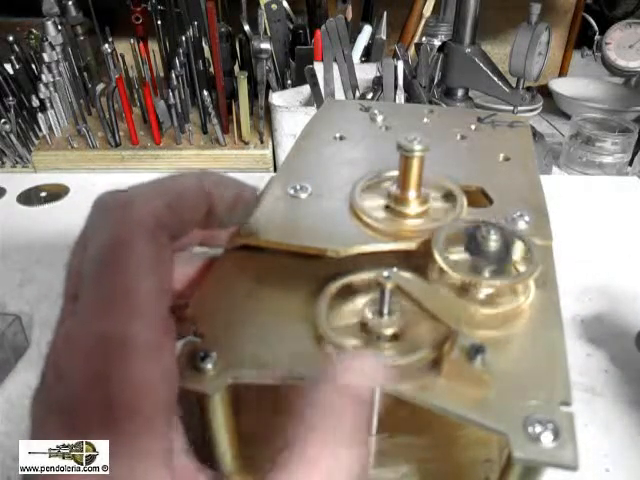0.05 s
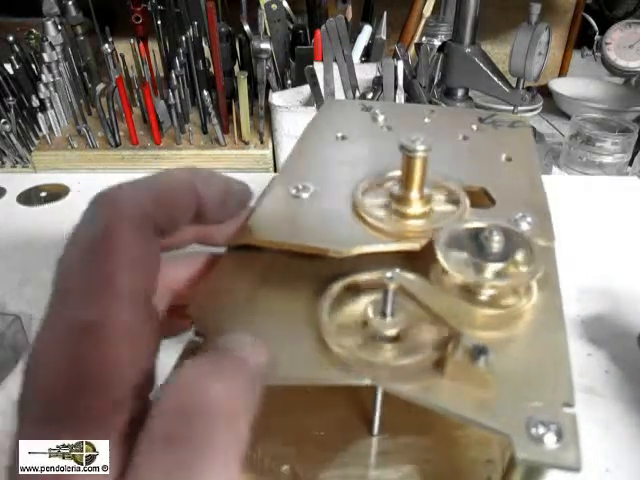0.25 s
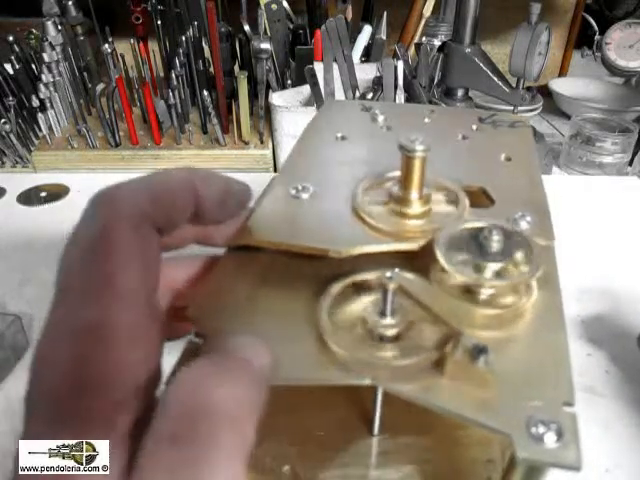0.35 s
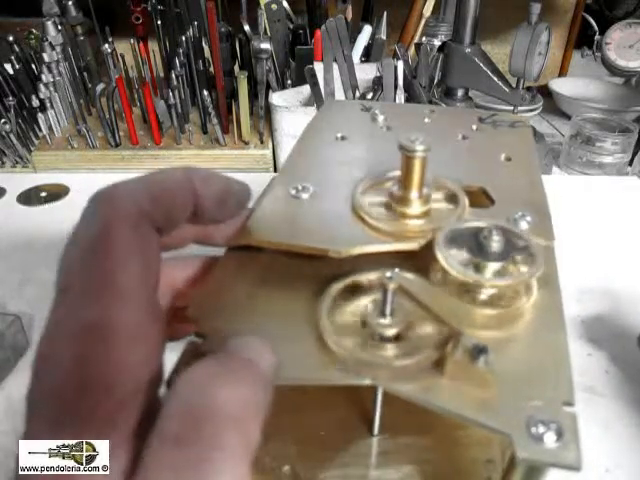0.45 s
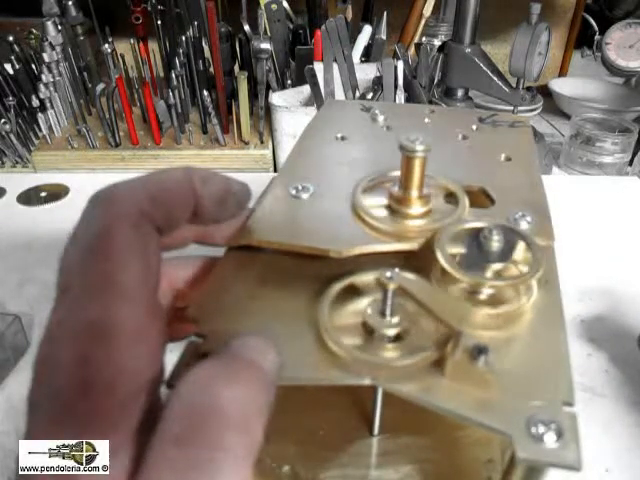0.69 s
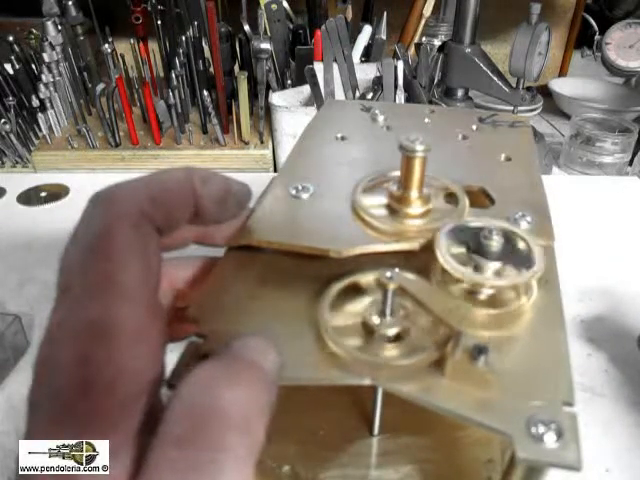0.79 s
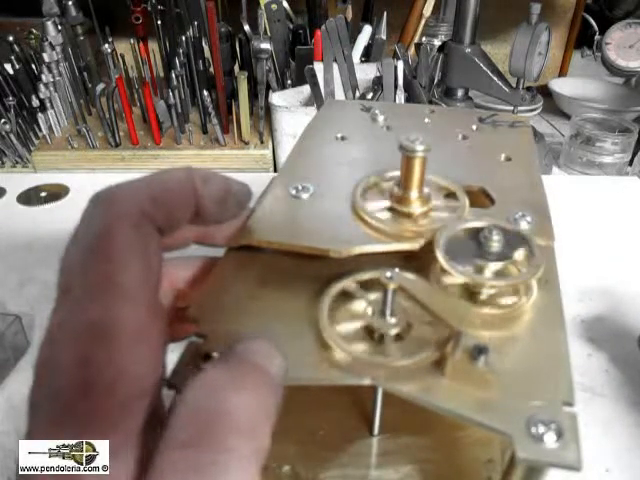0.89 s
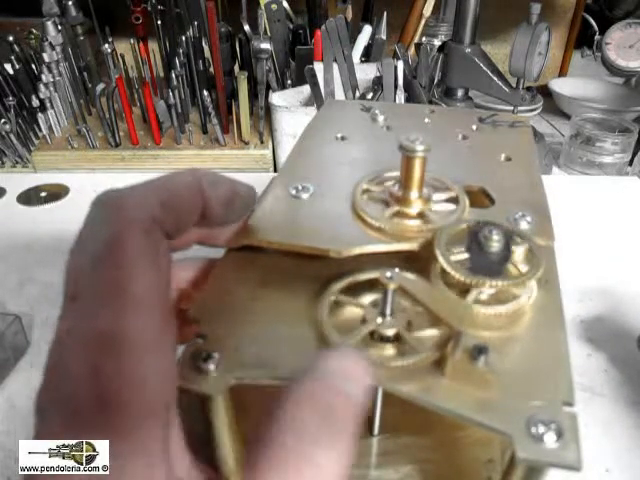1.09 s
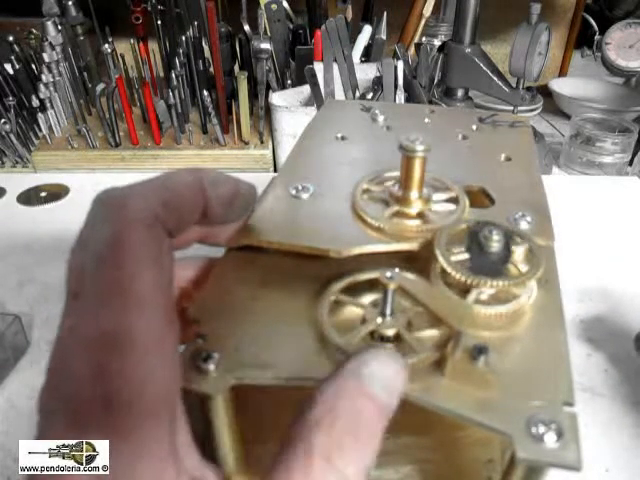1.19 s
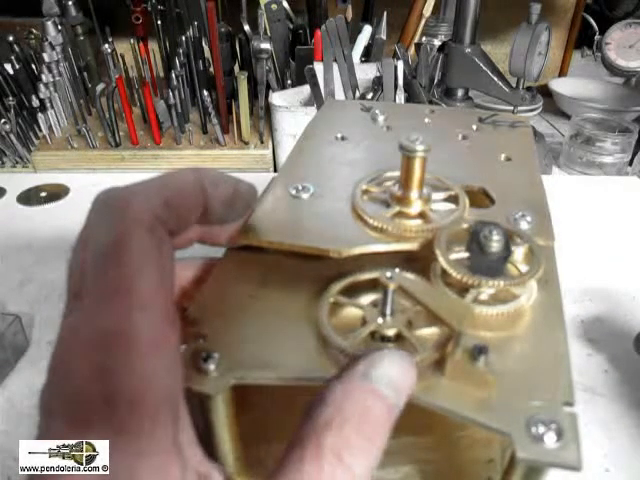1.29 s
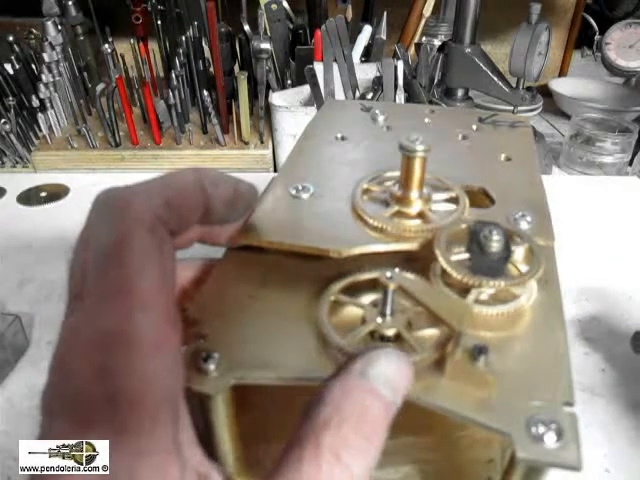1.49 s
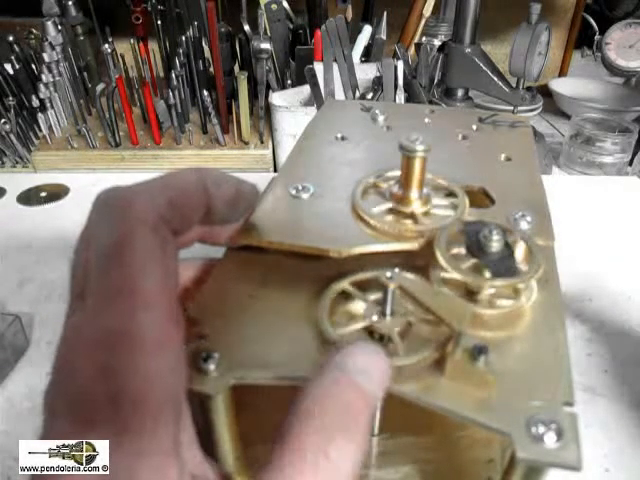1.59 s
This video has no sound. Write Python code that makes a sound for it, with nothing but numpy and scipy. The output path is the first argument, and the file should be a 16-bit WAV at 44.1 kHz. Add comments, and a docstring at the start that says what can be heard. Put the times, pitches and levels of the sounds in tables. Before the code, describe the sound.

Sharp metallic clack and fading gear whirr from a handled clock movement, followed by small clicks.

```python
"""On a workbench in a quiet room, a wheel of a brass clock movement slips from under a thumb.
The frame rings with a sharp clack, and tooth impacts drive a whirr that slows and fades as the gear
train runs down. The frame knocks once on the bench, whose wooden top booms. The thumb returns to the
wheels with two small clicks and a dry pivot squeaks faintly, over room noise and a thin electrical whine."""
import sys
import numpy as np
from scipy import signal
from scipy.fft import next_fast_len
from scipy.io import wavfile
from scipy.ndimage import uniform_filter1d

SR = 44100
rng = np.random.default_rng(int(sys.argv[2]) if len(sys.argv) > 2 else 0)


def wrap_up_sound(samples):
    """Save the sound to the file named by the first command line argument, as 16-bit audio."""
    columns = np.atleast_2d(samples).T
    # keep every value between -1 and 1, then stretch to whole-number steps
    tamed = np.clip(columns, -1, 1)
    steps = np.round(tamed * 32767).astype(np.int16)
    wavfile.write(sys.argv[1], SR, steps)


N = 72765
T = np.arange(N) / SR

# Levels in the tables are relative.
# Blows on the frame, and of a wheel on its stop: start_s, level_db, corner_hz
FRAME_BLOWS = [(0.2145, -17.5, 5500), (0.2235, -17, 4500), (0.2272, -1.5, 15400), (0.2322, -5, 11500),
               (0.4365, -22, 8000), (0.528, -32, 5500)]
WHEEL_BLOWS = [(0.637, -10, 3800), (0.817, -12, 4200), (0.856, -14, 7000), (0.941, -15, 3800),
               (1.3312, -6, 13900), (1.3412, -1, 7500), (1.582, -15, 4200), (1.5925, -3, 6500)]
# Thumbnail ticks on the wheel's rim: start_s, level_db
NAIL_TICKS = [(1.3314, 0), (1.593, -17)]
# Scrapes of brass on brass: centre_s, half_width_s, level_db, corner_hz
SCRAPES = [(0.036, 0.01, -53.5, 9100), (0.43, 0.0039, -40.5, 4000), (0.501, 0.0057, -45, 3800),
           (0.871, 0.0088, -57, 5100)]
# Distinct modes of each struck part: pitch_hz, level_db, t60_s
FRAME_MODES = [(361, -16.5, 0.68), (511, -7, 0.5), (974, -8, .12), (1110, 0, .09), (1245, 7, 0.12),
               (1357, -2, 0.22), (2611, -8, 0.6), (3018, 2, 0.1), (3470, 4, 0.13), (3870, 10, 0.11),
               (4060, 4.5, 0.12), (4985, -14, 0.55), (5428, 6, 0.15), (5948, 1, 0.22), (6401, -18, 0.55),
               (6570, -3.5, 0.33), (7335, 8, 0.11), (7461, -9, 0.55), (7750, 8, 0.11), (8170, 3, 0.09),
               (8774, 0, .11), (8915, 4, .13), (9700, 2, 0.12)]
WHEEL_MODES = [(702, -9, 0.14), (1270, -1, 0.06), (1352, 1, .11), (1865, -3, .1), (2110, -4, .1),
               (2580, -1, 0.08), (3298, 7, .085), (4400, -2, 0.07), (5975, -7, 0.12), (8920, -13, .14)]
RIM_MODES = [(3800, -34.5, 0.027), (4140, -41.5, 0.067)]
BENCH_MODES = [(59.6, -48, 0.46), (64.6, -50, 1.62), (151, -48, 0.1), (615, -41.5, 0.12),
               (710, -40.5, 0.14), (1110, -38.5, 0.098), (1207, -24, 0.018), (1305, -30.5, 0.057),
               (1670, -34, 0.037), (2140, -42, 0.057)]
# Resonances driven by the meshing teeth: pitch_hz, width_hz, level_db
MESH_RESONANCES = [(1320, 100, -1.5), (1840, 150, -3), (2110, 90, -3), (2450, 90, -3), (2600, 110, 2),
                   (3330, 130, -2), (3690, 90, -8), (5940, 90, -12), (6565, 26, -15)]
# Spectral densities of densely packed modes: frequency_hz, level_db
FRAME_SPECTRUM = [(100, -38), (400, -31.5), (750, -18), (1150, -7), (1600, -10), (2500, -5.5), (4100, -1),
                  (4550, -7), (5400, -1.5), (6700, -4.5), (7600, 1), (8500, -3.5), (11000, -4),
                  (11350, -12), (12100, -20), (13600, -19.5), (16000, -36)]
WHEEL_SPECTRUM = [(150, -40), (700, -20), (950, -8), (1250, 2), (1600, -5.5), (2400, 4), (3000, -2),
                  (3750, -1), (4700, -9), (5400, -7.5), (6800, -16.5), (10000, -9), (11500, -41)]
MESH_SPECTRUM = [(150, -30), (1000, -10), (1250, -0.5), (1550, -2.5), (2000, 1.5), (2250, -10), (2650, 2),
                 (3050, -7), (3700, 0), (4700, -10.5), (5100, -1), (6200, -6.5), (6750, -14.5),
                 (7500, -9.5), (8400, -19.5), (9000, -7), (10800, -14), (11500, -44)]
THUD_SPECTRUM = [(200, -16.5), (550, -0.5), (1150, 2), (1600, -9.5), (2100, -5), (3000, -11.5)]
BOOM_SPECTRUM = [(35, -9), (62, -3), (130, -2.5), (400, -6), (900, -19), (2000, -51)]
GRAZE_SPECTRUM = [(3000, -20), (8000, 2), (10600, -4.5), (11600, -25)]
# Spectral densities of the shifting frame's rumble and the room noise: frequency_hz, level_db
SHIFT_SPECTRUM = [(35, -18), (62, 0), (110, -19), (500, -15.5), (2000, -43)]
ROOM_SPECTRUM = [(15, -13), (28, -4), (55, 2.5), (90, -3), (160, -7), (275, -5), (770, -10), (2700, -16.5),
                 (7600, -20.5), (10400, -23), (11400, -27), (14000, -28.5), (15600, -32)]
# Envelopes of the running train, the shifting frame and the pivot: time_s, level_db
TRAIN_ENVELOPE = [(0.155, -28.5), (0.205, 0), (0.25, 2), (0.305, -7), (0.325, 4), (0.355, 2), (0.372, -5),
                  (0.41, -2), (0.435, 5), (0.465, -4.5), (0.53, -2.5), (0.6, -5.5), (0.73, -8), (0.86, -12),
                  (0.91, -18), (1.05, -17.5), (1.12, -29)]
SHIFT_ENVELOPE = [(0.22, -70), (0.275, -54), (0.33, -63), (0.38, -57)]
SQUEAK_ENVELOPE = [(1.335, -72), (1.36, -61), (1.395, -62), (1.42, -56.5), (1.51, -65.5), (1.55, -76)]


def frame_clacks():
    """Impact excitation: each blow sets the brass frame in free, damped vibration."""
    return strikes(FRAME_BLOWS, FRAME_SPECTRUM, FRAME_MODES, dense_t60_s=0.079, dense_db=10, modes_db=-36)


def gear_train():
    """Forced vibration: uneven, slowing tooth impacts drive the wheels and plates."""
    start_teeth_per_s, slowing_s, turns_per_s = 1500, 0.9, 1.3
    tooth_spread_db, flutter_db = 3, 1.4
    rate = start_teeth_per_s * np.exp(-np.maximum(T - TRAIN_ENVELOPE[0][0], 0) / slowing_s)
    teeth_passed = np.cumsum(rate * np.exp(0.4 * wander(samples=100))) / SR
    impacts = np.diff(np.floor(teeth_passed), prepend=0)
    force = impacts * amp(tooth_spread_db * np.clip(rng.standard_normal(N), -2, 2)) / np.sqrt(rate)
    flutter = amp(flutter_db * wander(samples=750))  # the wheels run unevenly
    drive = amp(-43) * unit_rms(force) * flutter * envelope(TRAIN_ENVELOPE)
    angle = 2 * np.pi * turns_per_s * T
    shares = np.cos(angle), np.sin(angle)  # rotation blends two responses
    return sum(signal.fftconvolve(drive * share, mesh_response())[:N] for share in shares)


def mesh_response():
    """Impulse response of wheels and plates at one tooth position; wider resonances decay faster."""
    peaks = np.zeros(N)
    for hz, width_hz, db in MESH_RESONANCES:
        tone = np.sin(2 * np.pi * (hz * T + rng.random()))
        peaks += amp(db) * unit_energy(np.exp(-np.pi * width_hz * T) * tone)
    return unit_energy(dense_ring(MESH_SPECTRUM, t60_s=0.071) + amp(0.5) * unit_energy(peaks))


def wheel_clicks():
    """Free vibration of a wheel that strikes its stop or is ticked by the thumbnail."""
    out = strikes(WHEEL_BLOWS, WHEEL_SPECTRUM, WHEEL_MODES, dense_t60_s=0.061, dense_db=-13.5, modes_db=-47)
    for start_s, db in NAIL_TICKS:
        add(out, start_s, amp(db) * modal_ring(RIM_MODES))
    return out


def bench_knock():
    """The bench top acts as a soundboard: a knock gives a short thud, and its low modes boom on."""
    wood = sum(amp(db) * decay(t60_s) * sine(hz) for hz, db, t60_s in BENCH_MODES) * rise(0.00044)
    thud = amp(-6.5) * dense_ring(THUD_SPECTRUM, t60_s=0.19)
    boom = amp(-14.5) * dense_ring(BOOM_SPECTRUM, t60_s=0.66) * rise(0.021)
    return add(np.zeros(N), start_s=0.3876, sound=lowpass(thud + boom - wood, corner_hz=3300))


def frame_shift():
    """Sliding friction: the frame rumbles softly on the bench as the wheel lets go."""
    return envelope(SHIFT_ENVELOPE) * noise(SHIFT_SPECTRUM)


def scrapes():
    """Stick-slip friction: brief swells of tiny slips ring the frame."""
    slips_per_s = 2500
    out = np.zeros(N)
    for centre_s, half_width_s, db, corner_hz in SCRAPES:
        slips = rng.standard_normal(N) * (rng.random(N) < slips_per_s / SR)
        rub = lowpass(colour(slips, FRAME_SPECTRUM), corner_hz)
        swell = 1 / np.cosh(np.clip((T - centre_s) / half_width_s, -20, 20))
        out += amp(db) * unit_rms(rub) * swell
    return out


def graze():
    """Light contact with a wheel's teeth excites mainly high modes."""
    return add(np.zeros(N), start_s=1.016, sound=amp(-24) * dense_ring(GRAZE_SPECTRUM, t60_s=0.18))


def pivot_squeak():
    """Friction at a dry pivot sustains a thin, nearly steady oscillation."""
    pitch_hz = 6570 * (1 + 0.00081 * wander(samples=600))
    return envelope(SQUEAK_ENVELOPE) * np.sin(2 * np.pi * np.cumsum(pitch_hz) / SR)


def reverberate(direct):
    """Diffuse reflections in a small workshop add an exponentially decaying tail."""
    tail = unit_energy(rng.standard_normal(N) * decay(t60_s=0.31) * rise(0.0057))
    return direct + amp(-13) * signal.fftconvolve(direct, tail)[:N]


def background():
    """Stationary room noise lies under the pure tone of an electrical whine."""
    return amp(-60) * noise(ROOM_SPECTRUM) + amp(-68) * sine(hz=5880)


def strikes(blows, spectrum, modes, dense_t60_s, dense_db, modes_db):
    """Each point of impact weights the dense modes anew; softer contact excites less treble."""
    out = np.zeros(N)
    for start_s, db, corner_hz in blows:
        ring = amp(dense_db) * dense_ring(spectrum, dense_t60_s) + amp(modes_db) * modal_ring(modes)
        add(out, start_s, amp(db) * lowpass(ring, corner_hz))
    return out


def dense_ring(spectrum, t60_s):
    """Modal overlap: countless close modes merge into decaying noise of unit energy."""
    return unit_energy(colour(rng.standard_normal(N) * decay(t60_s), spectrum))


def modal_ring(modes):
    """Superposition of damped modes, neighbours starting in opposite phase."""
    return sum((-1) ** k * amp(db) * decay(t60_s) * sine(hz) for k, (hz, db, t60_s) in enumerate(modes))


def colour(x, spectrum):
    """Minimum-phase filtering: the phase follows from the log gain by a Hilbert transform."""
    size = next_fast_len(2 * N)
    hz, db = np.transpose(spectrum)
    log_hz = np.log(abs(np.fft.fftfreq(size, 1 / SR)) + 1)
    log_gain = np.log(amp(np.interp(log_hz, np.log(hz), db)))
    response = np.exp(np.conj(signal.hilbert(log_gain)))
    return np.fft.ifft(np.fft.fft(x, size) * response).real[:N]


def lowpass(x, corner_hz):
    """Second-order treble roll-off."""
    return signal.lfilter(*signal.butter(2, corner_hz, fs=SR), x)


def noise(spectrum):
    """Filtered Gaussian noise of unit rms."""
    return unit_rms(colour(rng.standard_normal(N), spectrum))


def wander(samples):
    """Moving average of noise, at unit rms."""
    return unit_rms(uniform_filter1d(rng.standard_normal(N), samples))


def sine(hz):
    """Simple harmonic motion."""
    return np.sin(2 * np.pi * hz * T)


def decay(t60_s):
    """Exponential damping, 60 dB in t60_s."""
    return np.exp(-np.log(1000) * T / t60_s)


def rise(seconds):
    """Linear onset."""
    return np.minimum(T / seconds, 1)


def envelope(points):
    """Gain interpolated in decibels, silent outside the points."""
    time_s, db = np.transpose(points)
    return amp(np.interp(T, time_s, db, left=-200, right=-200))


def amp(db):
    """Decibels to amplitude ratio."""
    return 10 ** (np.asarray(db) / 20)


def unit_energy(x):
    """Normalisation to energy one."""
    return x / np.sqrt(np.sum(x ** 2) + 1e-20)


def unit_rms(x):
    """Normalisation to rms one."""
    return unit_energy(x) * np.sqrt(len(x))


def add(mix, start_s, sound):
    """Superposes a delayed sound on the mix, in place."""
    part = mix[round(start_s * SR):][:len(sound)]
    part += sound[:len(part)]
    return mix


def scene():
    """Linear superposition of the reverberant brass, the bench, the pivot and the background."""
    brass = frame_clacks() + wheel_clicks() + gear_train() + scrapes() + graze()
    return (reverberate(brass) + frame_shift() + bench_knock() + pivot_squeak() + background())[None]


def record(dry):
    """A notch filter dips the treble and a low-pass filter limits the band."""
    dip_hz, dip_width_hz, edge_hz = 11880, 1700, 15800
    dipped = signal.lfilter(*signal.iirnotch(dip_hz, dip_hz / dip_width_hz, fs=SR), dry)
    band_limit = signal.firwin(511, edge_hz, window=("kaiser", 9), fs=SR)
    return signal.oaconvolve(dipped, band_limit[None], "same")


dry = scene()
out = record(dry)
wrap_up_sound(out)
```